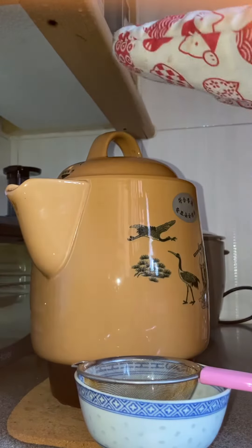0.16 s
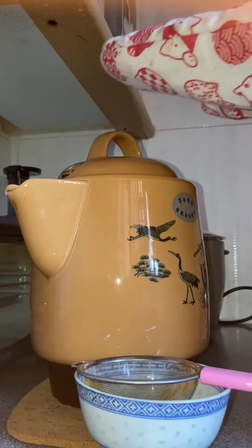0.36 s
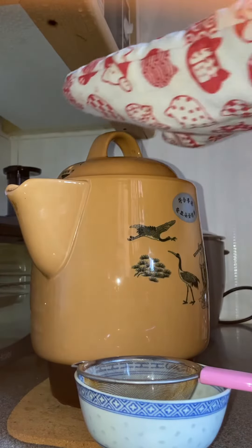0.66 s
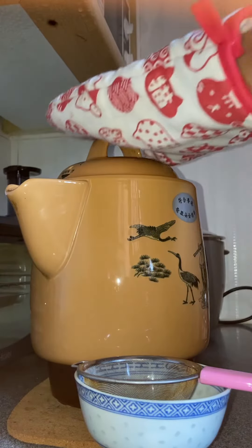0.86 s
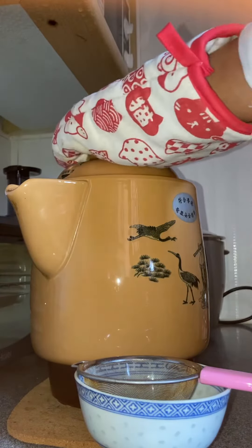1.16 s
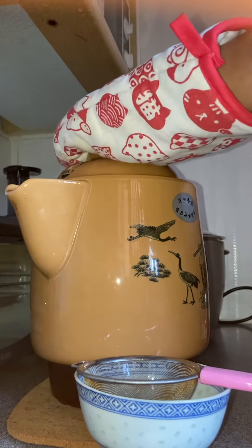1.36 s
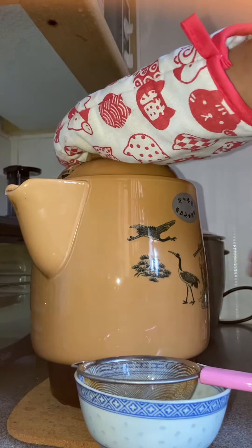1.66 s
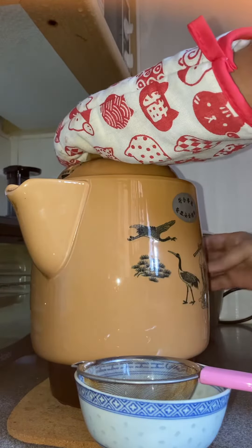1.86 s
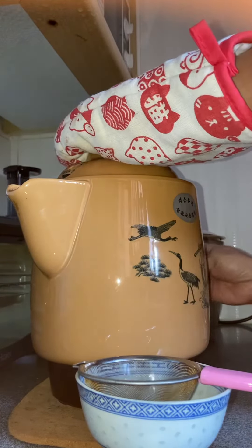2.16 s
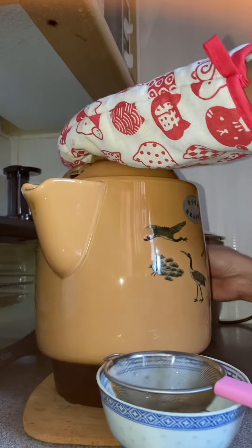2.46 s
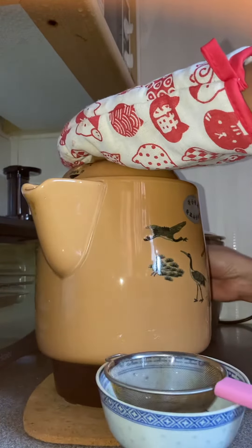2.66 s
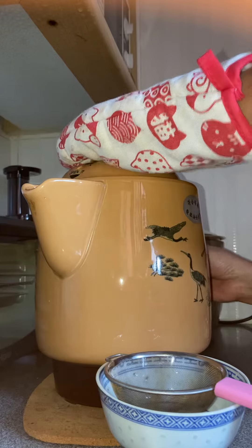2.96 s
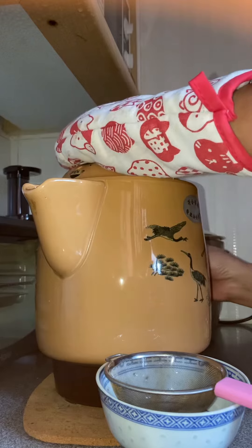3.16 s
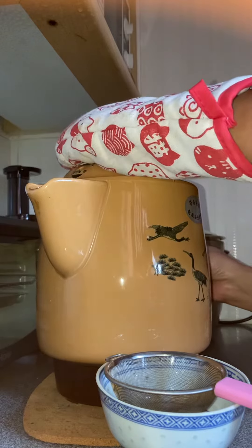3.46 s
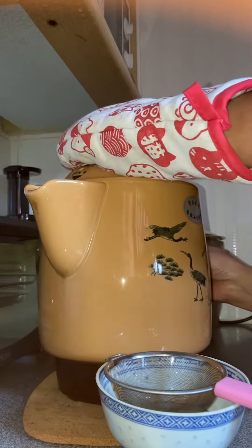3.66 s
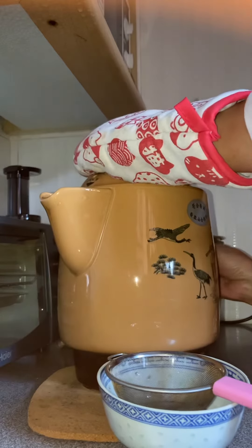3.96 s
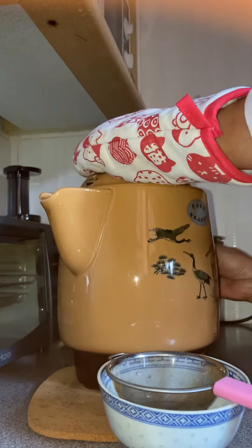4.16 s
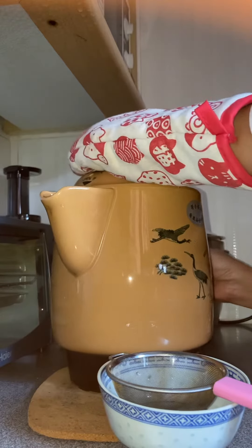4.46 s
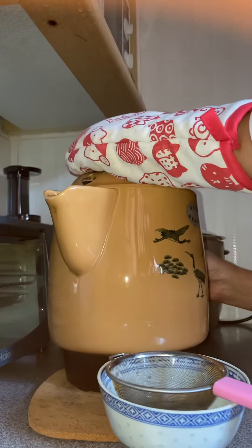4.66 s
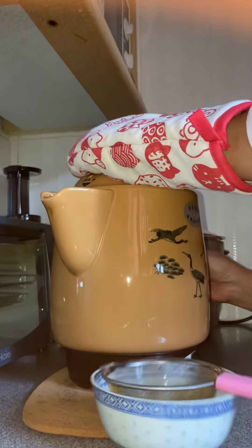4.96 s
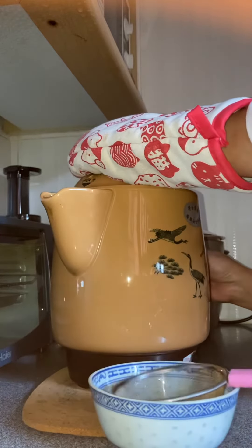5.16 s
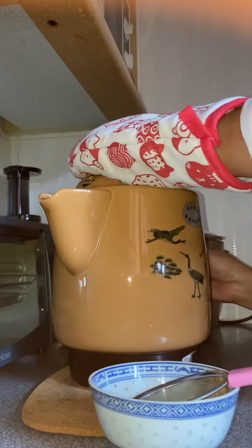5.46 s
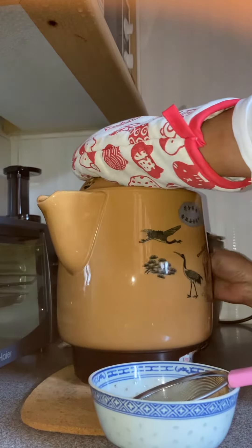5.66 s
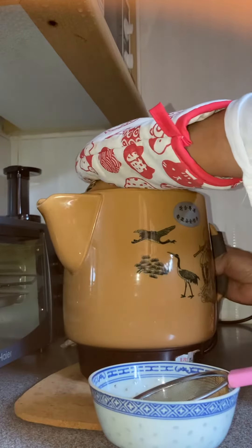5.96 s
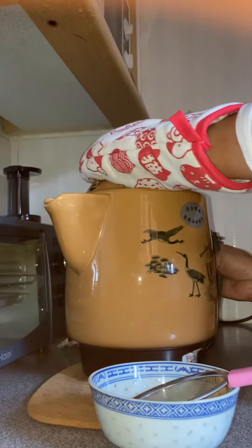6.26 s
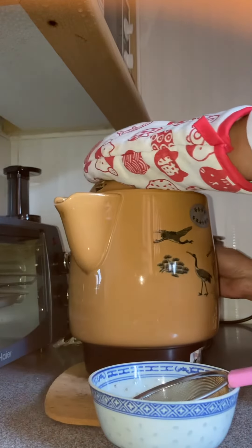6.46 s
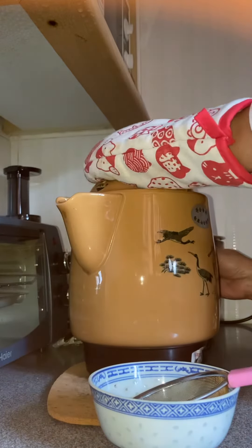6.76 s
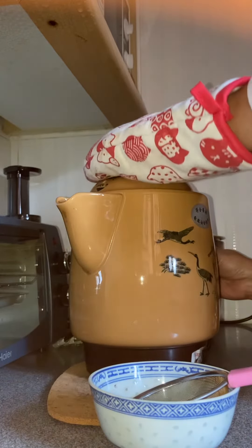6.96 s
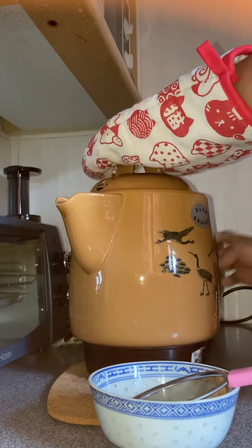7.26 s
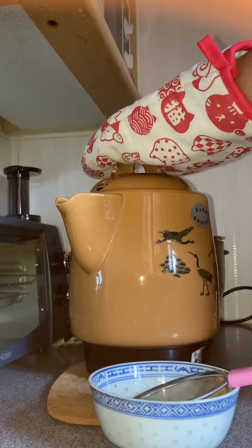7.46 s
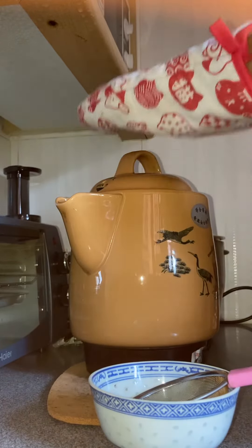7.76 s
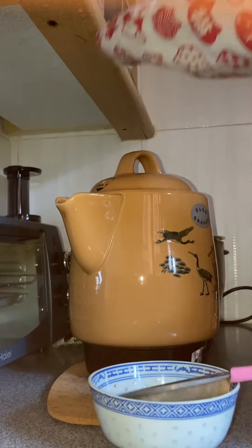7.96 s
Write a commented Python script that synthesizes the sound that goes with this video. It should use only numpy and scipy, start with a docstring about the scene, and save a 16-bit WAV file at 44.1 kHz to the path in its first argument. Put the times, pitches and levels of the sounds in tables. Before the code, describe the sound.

Mostly very quiet: faint hush, low room rumble cutting in and out, barely audible glove rustle. First a moderate ceramic knock with little bouncing clinks, later one dominant pot clunk whose jolt sets a metal strainer jingling and sizzling against a bowl for under half a second. Near the end a gentle lid brush and tap, then one bright strainer-on-porcelain clink. Close, dry, with short kitchen echoes.

```python
"""A ceramic pot, shifted by a gloved and a bare hand, knocks on a kitchen counter close to a two-port microphone.
Its knocks are bursts of uneven contacts ringing the pot; taps are single rings, the bowl's foot grinds in grains.
A wire strainer bounces and rolls in a bowl: its touches set the bowl's rings going and make the mesh sizzle.
Shaped noise makes the glove's rustle, the pot's drag, a faint, flickering hush that never stops, and low background
noise that a noise gate lets through in listed spells; delays that feed back make the kitchen's echoes."""
import sys
import numpy as np
from scipy import signal
from scipy.fft import rfft, irfft, next_fast_len
from scipy.io import wavfile
from scipy.ndimage import uniform_filter1d

SR = 44100
rng = np.random.default_rng(int(sys.argv[2]) if len(sys.argv) > 2 else 0)


def dump(signal):
    """Clip the signal to [-1, 1] and save it as 16-bit WAV at the path in sys.argv[1]."""
    limited = np.clip(np.atleast_2d(signal).T, -1, 1)
    pcm = np.round(limited * 32767).astype(np.int16)
    wavfile.write(sys.argv[1], SR, pcm)


N = 358268   # length of the scene in samples

# In rows that swell and fade, the sound is 20 dB down one rise before and one fall after its loudest
# moment; the sign of a rise or fall does not matter. Noise colours are relative: noise is set to rms 1.

# pot and bowl knocking on base and counter: (time [s], peak level [dB], contact pitch [Hz], chatter t60 [s])
POT_KNOCKS = [(0.384, -54.5, 850, 0.038), (1.128, -51, 324, 0.047), (1.186, -58, 600, .04),
              (1.341, -55.5, 238, 0.065), (2.095, -55, 9020, 0.012), (2.151, -53.5, 500, .2),
              (2.251, -36, 902, 0.051), (2.258, -41, 2600, 0.27), (2.261, -24.5, 910, 0.045),
              (2.285, -19.5, 1000, 0.039), (2.299, -33, 510, 0.09), (2.310, -35.5, 1600, 0.17),
              (2.400, -48.5, 454, .2), (3.027, -54.5, 2930, 0.021), (3.039, -55.5, 750, 0.1),
              (3.466, -49, 2600, 0.038), (3.468, -51.5, 7940, 0.044), (3.800, -39.5, 324, .06),
              (4.442, -47, 2010, 0.036), (4.633, -46, 894.5, 0.033), (4.782, -58.5, 1527, .04),
              (4.938, -26.5, 2511, 0.066), (4.949, -4.5, 1522, 0.067), (4.953, -17.5, 286.7, 0.08),
              (4.967, -22.5, 902.6, .06), (4.984, -16.5, 1526, 0.11), (5.006, -24, 1186, .05),
              (5.012, -27.5, 303.5, .12), (5.035, -30, 615.6, .12), (5.072, -27, 1473, 0.04),
              (5.083, -30, 1600, .07), (5.179, -37, 1592, 0.13), (5.221, -32, 1700, 0.19),
              (5.263, -35, 481.5, 0.05), (5.280, -39, 691, .08), (5.350, -46.5, 454, 0.11),
              (5.439, -52, 2260, 0.3), (5.624, -50, 1440, .03), (5.727, -45, 469, 0.055),
              (7.088, -46, 6050, 0.032), (7.134, -46, 1800, 0.056), (7.614, -48, 1280, .04),
              (7.942, -38, 2900, 0.04), (7.955, -42, 2600, .04), ]
# rings of the pot on the counter, damped by the hands: (pitch [Hz], relative level [dB], t60 [s])
POT_RINGS = [(83.6, 2.5, 0.15), (236, -3.5, 0.069), (359, -5, 0.06), (470, -3.5, 0.05), (568, 1, 0.019),
             (772, -8, 0.033), (1114.6, -11.5, 0.077), (1322, -6, .04), (1690, -3, 0.033),
             (1940, -10, 0.025), (2430, -11, 0.025), (2680, -12, 0.028), (3150, -16.5, .025),
             (3880, -18.5, 0.092)]
# clean taps on the pot's wall, each waking one ring: (time [s], peak level [dB], pitch [Hz], t60 [s])
WALL_TAPS = [(2.264, -26, 919, 0.042), (2.287, -24, 1894, 0.018), (3.029, -47.5, 1974, 0.032),
             (3.031, -56.5, 636, .05), (4.962, -31, 855, 0.064), (5.015, -28, 830, 0.094),
             (2.398, -46, 509, 0.084), (2.534, -53, 374, 0.073), (7.143, -47.5, 1370, 0.026),
             (7.142, -48.5, 1990, .022), (7.147, -44, 810, 0.024)]
# bowl's foot grinding around the first hard knock: (loudest moment [s], level [dB], rise [s], fall [s])
FOOT_SCRAPES = [(2.26, -36, 0.021, 0.2019), (2.242, -54.5, .12, -0.14)]
SCRAPE_HZ, GRIT_PER_S = (470, 1200), 900   # band of the grind [Hz], average grains a second
# pot dragging over its base: (loudest moment [s], level [dB], rise [s], fall [s])
POT_SLIDES = [(.395, -66, .04, .04), (6.33, -70, .07, .3), (4.47, -62, .03, .15), (4.55, -63, .12, .12),
              (4.63, -61, .12, .03), (5.46, -64, .12, .2), (5.75, -66, .05, .15)]
# colour of the drag: (frequency [Hz], level [dB per Hz])
DRAG_COLOUR = [(530, -32.5), (900, -7.5), (2390, -0.5), (4620, -14), (5810, -40), (6200, -10), (8760, -19),
               (12000, -44), (15600, -77), (22000, -120)]

# strainer bouncing on the bowl's rim: (time [s], strength [dB], tilt around 7400 Hz [dB per octave])
STRAINER_BOUNCES = [(2.3073, -28, -1), (2.378, -40, 2.5), (2.43, -45, 3), (2.478, -47, 2),
                    (2.526, -50.5, 1), (2.565, -59, 5), (2.601, -53, -2.5), (2.655, -51, 2.5),
                    (2.704, -57, 6), (4.9523, -21, 10.5), (4.9645, -21.5, -2), (4.983, -20.5, 5),
                    (5.073, -20, 5.5), (5.086, -25.5, 2.5), (5.123, -40, 1.5), (5.163, -37.5, 1.5),
                    (5.186, -39, -8.5), (5.224, -39.5, -7.5), (5.2604, -38, -6), (5.279, -37.5, -1.5),
                    (5.308, -42.5, -3.5), (5.3393, -45, -5.5), (7.9417, -12, 3), (7.949, -21.5, -1.5),
                    (7.9595, -16.5, 6.5)]
# strainer rolling along the rim: (loudest moment [s], level before the contact level [dB], rise [s], fall [s])
STRAINER_ROLLS = [(2.44, -63, 0.042, 0.3), (5.0, -35.5, .02, 0.0367), (5.088, -33.5, 0.0044, -0.0014),
                  (5.192, -39, 0.064, -0.02), (5.275, -42.5, 0.028, 0.0427), (5.28, -49.5, .16, 0.1827),
                  (7.952, -33.5, 0.0078, .015)]
# pitches of bowl and strainer: (pitch [Hz])
BOWL_PITCHES = [1640, 1632, 2990, 2971, 4910, 4900, 7385, 7700, 10320, 12841, 13010, 13650, 15722]
# their rings in the same order, with the strainer resting in the bowl and lifted out:
# (resting level [dB], resting t60 [s], lifted level [dB], lifted t60 [s])
BOWL_RINGS = [(-8.5, 0.038, -3, 0.044), (-15, 0.11, -21.5, 0.32), (-6, 0.079, -6.5, 0.067),
              (-20.5, .25, -17.5, 0.25), (-16, 0.06, -17, 0.051), (-12.5, 0.37, -29.5, 0.2),
              (-2.5, .06, -0.5, 0.019), (-7.5, .015, 2, 0.0095), (-8.5, 0.068, -6, .1),
              (-24.5, .12, -18.5, 0.22), (-13.5, 0.068, -10.5, .053), (-19, .081, -19, 0.099),
              (-13.5, .12, -12, 0.123)]
# colour of the wire mesh's sizzle: (frequency [Hz], level [dB per Hz])
MESH_COLOUR = [(1470, -43.5), (2500, -16.5), (5500, -23.5), (7600, -10), (10600, -8), (12000, -52),
               (12400, -9.5), (13300, -7), (16100, -23.5), (16500, -23.5)]
# until it is lifted out, the strainer rests in the bowl and damps its rings;
# lifted, it shivers and sizzles less: moment [s], then the two changes of level [dB]
LIFTED_S, LIFTED_SHIVER_DB, LIFTED_SIZZLE_DB = 6.5, -24, -13
# wire shivering on the rim after each bounce: start relative to the bounce, before the contact level [dB], t60 [s]
SHIVER_DB, SHIVER_T60_S = -17, 0.11
SHIVER_TILT = 4.5   # tiny contacts hardly move the low rings [dB per octave below 7400 Hz]
SWELL_T60_S = .0035   # a touch lasts a moment, so each ring swells in
SIZZLE_T60_S = .14
# below this strength [dB], touches roll more than they strike: their strikes fall 1.25 dB for each dB
HARD_DB, STRIKE_GROWTH = -20, 1.25
TICK_GROWTH = 1.8   # ticks grow 1.8 dB for each dB of strength, so gentle touches tick far less

# glove cloth brushing the lid: (loudest moment [s], level [dB], rise [s], fall [s])
GLOVE_STROKES = [(.285, -70, .07, .09), (.4, -72, .04, .05), (1.13, -69, .12, .11), (1.87, -65, .05, .15),
                 (1.955, -63, .12, .12), (2.1, -68, .06, .12), (2.26, -65, .08, .05), (2.94, -70, .1, .1),
                 (3.032, -66, .008, .07), (4.4, -69, .22, .15), (6.39, -73, .1, .16), (5.5, -62, .12, .12),
                 (5.75, -68, .15, .12), (6.19, -71, .07, .2), (7.14, -52, .08, .07)]
# colour of the glove's rustle: (frequency [Hz], level [dB per Hz])
CLOTH_COLOUR = [(1470, -35.5), (2500, -15), (3980, -9.5), (5090, -11.5), (5420, -39), (5680, -20),
                (7600, -5.5), (8300, 12), (11000, 4.5), (14000, -2.5), (15600, -12.5), (16500, -29.5)]
FIBRES_PER_S, FIBRE_DB = 600, -8   # fibres catching: average rate, level against the smooth rustle

# spells in which the noise gate lets the low background noise through, later rows replacing earlier:
# (start [s], end [s], level [dB])
GATE_OPEN_SPELLS = [(0, 0.07, -53), (0.211, 0.427, -54), (.47, .893, -56), (1.024, 1.23, -71.5),
                    (1.32, 1.397, -69), (2.105, 2.54, -61), (2.548, 2.78, -63.5), (3.121, 3.275, -68),
                    (3.371, 4.124, -54.5), (4.122, 4.44, -66), (4.447, 4.663, -54.5), (4.786, 4.841, -58),
                    (4.944, 5.34, -49.5), (5.34, 5.852, -58), (5.846, 6.283, -67), (6.278, 7.06, -54.5),
                    (7.061, 7.184, -51.5), (7.435, 7.704, -55.5), (7.739, 8.002, -57), (8.003, 8.13, -67)]
GATE_CLOSED_DB = -77.5   # the level it is turned down to between spells
# colour of the low background noise: (frequency [Hz], level [dB per Hz])
LOW_NOISE_COLOUR = [(12, -60), (30, -34), (48, -11), (91, 1), (169, -11), (323, -10), (361, -8), (709, -27),
                    (966, -25), (1110, -29), (3060, -40), (3520, -50), (8650, -50), (16500, -72)]
# wavering tones within it: (pitch [Hz], width [Hz], level against the noise [dB])
LOW_NOISE_TONES = [(94.6, 4.7, -6.5), (391, 60, -9.5)]
# colour of the faint, flickering hush that never stops: (frequency [Hz], level [dB per Hz])
HUSH_COLOUR = [(18, -51.5), (30, -30), (48, -5), (107, -12), (235, -32.5), (577, -10.5), (625, -13),
               (953, -26.5), (1800, -30.5), (2400, -25.5), (3860, -36.5), (6200, -37.5), (8760, -28),
               (16500, -46)]
HUSH_DB, HUSH_FLICKER_DB = -73, 2.5

# how alike left and right noises are, 1 the same and -1 opposite: (frequency [Hz], likeness [-1 to 1])
LEFT_RIGHT_LIKENESS = [(60, 0.99), (240, .99), (950, -0.042), (3770, -0.47), (15000, 1)]
# how far the left port leads the right, for the pot: (frequency [Hz], lead [radians])
POT_PHASE_LEAD = [(0, 0), (200, -.3), (600, 1.29), (1640, -4.4), (3100, -1.5), (3880, -1.5), (4910, -11),
                  (6120, -9), (7750, -5), (9560, -5), (10900, -2), (12600, -3), (14000, 0), (16500, -0.6)]
# the same for the bowl: (frequency [Hz], lead [radians])
BOWL_PHASE_LEAD = [(0, -0.5), (600, 11.5), (1550, 8), (2150, 7.5), (3620, 9), (4480, 10.5), (6800, 10.5),
                   (11400, 15), (13100, 17), (14400, 20.5), (16500, 17)]
# the same for background, glove and drag: (frequency [Hz], lead [radians])
BACKGROUND_PHASE_LEAD = [(0, 0), (520, -0.33), (780, -1.54), (1210, 5), (1640, 3.5), (3010, 5), (4050, 3),
                         (6120, 2.5), (7750, 5), (9560, 6), (11100, 8.5), (13000, 10), (13900, 13),
                         (16500, 13)]
KITCHEN_T60_S, WALL_CUT_HZ = .35, 5800   # bass fading time of the echoes, treble cut on each round
ECHO_LOW_CUT_HZ = 250   # the bass reaches both ports alike, so echoes carry little of it
# dips in the microphone's response: (frequency [Hz], width [Hz])
MICROPHONE_DIPS = [(5900, 550), (11700, 2000)]
CUTOFF_HZ = 16300


def knocks(body_db, rise_share):
    """Each knock is a chatter of uneven contacts that swells and dies, heard directly and through the pot's rings."""
    out = np.zeros(N + SR)
    t = np.arange(SR // 2) / SR
    for s, peak_db, hz, t60 in POT_KNOCKS:
        swell = 1 - np.exp(-t / (rise_share * t60))
        chatter = rng.laplace(size=len(t)) * swell * from_db(-60 * t / t60)
        band = [hz / 1.817, min(hz * 1.915, 15000)]
        force = signal.sosfilt(signal.butter(2, band, "band", fs=SR, output="sos"), chatter)
        body = np.zeros(len(t))
        for k, (ring_hz, ring_db, ring_t60) in enumerate(POT_RINGS):
            body += (-1) ** k * from_db(ring_db) * ring(force, ring_hz, ring_t60)
        sound = force + from_db(body_db) * body
        # height of the loudest swings, from the strongest short stretch
        crest = np.sqrt(2 * uniform_filter1d(sound ** 2, size=300).max())
        out[round(s * SR):][:len(t)] += from_db(peak_db) * sound / crest
    return out[:N]


def taps():
    """A single contact sets one ring going, swelling in over a moment."""
    out = np.zeros(N)
    for s, peak_db, hz, t60 in WALL_TAPS:
        click = np.zeros(SR // 4)
        click[0] = 1
        # two rings of the same pitch, one driving the other
        sound = ring(ring(click, hz, t60), hz, t60 / 3)
        out[round(s * SR):][:len(click)] += from_db(peak_db) * sound / np.abs(sound).max()
    return out


def scrape():
    """Grit under a sliding foot: dense grains in a dull band, growing with pressure."""
    band = signal.butter(3, SCRAPE_HZ, "band", fs=SR, output="sos")
    grit = signal.sosfilt(band, grains(GRIT_PER_S, spread_db=2.5))
    return swells(FOOT_SCRAPES) * rms_one(grit)


def drag():
    """Unglazed clay rubbing on the base: a dull, uneven hiss."""
    return swells(POT_SLIDES) * noise(DRAG_COLOUR, patchy_db=1.5)


def clinks(scatter_db, contact_db, sizzle_db):
    """Bounces and tiny rolling contacts keep the bowl's rings going; each bounce also makes the mesh tick and sizzle."""
    s, strength_db, tilt = np.transpose(STRAINER_BOUNCES)
    at = np.round(s * SR).astype(int)
    jolts = np.zeros(N)
    jolts[at] = from_db(strength_db)
    resting = np.arange(N) / SR < LIFTED_S
    lifted = ~resting

    # tiny contacts: a shiver after each bounce, and the rolling
    loose = jolts * from_db(LIFTED_SHIVER_DB * lifted)
    shiver = from_db(SHIVER_DB) * fade(loose, SHIVER_T60_S) + swells(STRAINER_ROLLS)
    contacts = shiver * from_db(contact_db) * (rng.random(N) < 1500 / SR)   # about 1500 a second

    # every bounce strikes every ring, a glancing touch tilting it to the treble
    strike_db = np.minimum(strength_db, HARD_DB + STRIKE_GROWTH * (strength_db - HARD_DB))
    chance_db = rng.normal(0, scatter_db, (len(at), len(BOWL_RINGS)))
    swell_gain = 2 * (1 - from_db(-60 / (SWELL_T60_S * SR)))
    rings = np.zeros(N)
    for k, (hz, row) in enumerate(zip(BOWL_PITCHES, BOWL_RINGS)):
        rest_db, rest_t60, lifted_db, lifted_t60 = row
        octaves = np.log2(hz / 7400)
        force = contacts * rng.standard_normal(N) * from_db(SHIVER_TILT * min(octaves, 0))
        force[at] += from_db(strike_db + tilt * octaves + chance_db[:, k])
        force = swell_gain * ring(force, hz, SWELL_T60_S)
        rings += from_db(rest_db) * ring(force * resting, hz, rest_t60)
        rings += from_db(lifted_db) * ring(force * lifted, hz, lifted_t60)

    # the mesh: a short tick, then a sizzling tail
    ticks = from_db(HARD_DB) * (jolts / from_db(HARD_DB)) ** TICK_GROWTH
    tick = from_db(-4) * fade(ticks, 0.01)
    tail = from_db(sizzle_db) * fade(ticks * from_db(LIFTED_SIZZLE_DB * lifted), SIZZLE_T60_S)
    return rings + (tick + tail) * noise(MESH_COLOUR, patchy_db=-2.0)[0]


def glove():
    """Fine fibres sliding over glaze: soft bright noise under each stroke, fluttering as fibres catch."""
    catches = rms_one(fade(np.abs(grains(FIBRES_PER_S, spread_db=4.5)), .02))
    flutter = rms_one(1 + from_db(FIBRE_DB) * catches) * from_db(1.2 * drift(25))
    return swells(GLOVE_STROKES) * flutter * noise(CLOTH_COLOUR, patchy_db=1.2)


def kitchen(x):
    """Eight feedback delays a side, duller on every round, like sound going back and forth between walls."""
    size = next_fast_len(N + SR)   # spare space at the end for the tail
    w = 2 * np.pi * np.fft.rfftfreq(size, 1 / SR)
    wall = 1 / (1 + 1j * w / (2 * np.pi * WALL_CUT_HZ))
    spectrum = rfft(x, size) * w / np.hypot(w, 2 * np.pi * ECHO_LOW_CUT_HZ)
    out = []
    for lags in rng.uniform(.008, 0.028, (2, 8)):   # delays in seconds
        echoes = 0
        for k, lag in enumerate(lags):
            one_round = from_db(-60 * lag / KITCHEN_T60_S) * wall * np.exp(-1j * w * lag)
            echoes = echoes + (-1) ** k * one_round / (1 - one_round)   # all rounds added up
        out.append(irfft(spectrum * echoes, size)[:N])
    return np.array(out)


def gated_low_noise(switch_ms):
    """Low noise with two wavering tones; a noise gate lets it through in listed spells and turns it down between."""
    level_db = np.full(N, float(GATE_CLOSED_DB))
    for start, end, open_db in GATE_OPEN_SPELLS:
        level_db[round(start * SR):round(end * SR)] = open_db
    gain = from_db(uniform_filter1d(level_db, size=int(switch_ms * SR / 1000)))   # slides between levels
    tones = np.zeros(N)
    for hz, width, db in LOW_NOISE_TONES:
        # noise through a narrow ring wavers; a wider ring wavers faster
        tones += from_db(db) * rms_one(ring(rng.standard_normal(N), hz, 2.0 / width))
    return gain * (noise(LOW_NOISE_COLOUR, patchy_db=-1.5) + tones)


def hush():
    """Faint coloured noise that never stops, its level flickering."""
    return from_db(HUSH_DB) * noise(HUSH_COLOUR, HUSH_FLICKER_DB)


def at_ports(x, lead):
    """The left port hears a sound with another phase than the right."""
    pair = np.broadcast_to(x, (2, N))
    hz = np.maximum(np.fft.rfftfreq(N, 1 / SR), 1)
    turn = np.exp(1j * at_hz(lead, hz))
    return np.array([irfft(rfft(pair[0]) * turn, N), pair[1]])


def ring(force, hz, t60):
    """A resonance: a unit click starts a sine near height 1 that dies by 60 dB in t60 seconds."""
    r = from_db(-60 / (t60 * SR))
    w = 2 * np.pi * hz / SR
    # the tiny constant keeps the filter from slowing down on silence
    return signal.lfilter([0, np.sin(w)], [1, -2 * r * np.cos(w), r * r], force + 1e-18)


def fade(jolts, t60):
    """Each jolt dies away by 60 dB in t60 seconds."""
    return signal.lfilter([1], [1, -from_db(-60 / (t60 * SR))], jolts + 1e-18)


def swells(rows):
    """Gain over time: each row swells and fades with a rounded top."""
    t = np.arange(N) / SR
    gain = np.zeros(N)
    for s, db, rise, fall in rows:
        steps = (t - s) / np.where(t < s, rise, fall)
        gain += from_db(db - 20 * steps ** 2)
    return gain


def grains(per_s, spread_db):
    """Random clicks of uneven size and either sign; rms 1."""
    hits = rng.random(N) < per_s / SR
    signs = rng.choice([-1, 1], N)
    sizes = from_db(spread_db * np.minimum(rng.exponential(1, N), 4))
    return rms_one(hits * signs * sizes)


def noise(spectrum, patchy_db):
    """Stereo noise of a given colour, flickering in level, with a left-right likeness by pitch; rms 1."""
    hz = np.maximum(np.fft.rfftfreq(N, 1 / SR), 1)
    mid, side = rfft(rng.standard_normal((2, N))) * from_db(at_hz(spectrum, hz))
    alike = np.clip(at_hz(LEFT_RIGHT_LIKENESS, hz), -1, 1)
    # the middle is shared; the side has opposite signs left and right
    pair = np.sqrt(1 + alike) * mid + np.sqrt(1 - alike) * side * [[1], [-1]]
    return rms_one(irfft(pair, N) * from_db(patchy_db * drift(4.6)))


def drift(rate):
    """Slow random wandering of rms 1; a higher rate wanders faster."""
    r = np.exp(-80 * np.pi * rate / SR)   # one step spans 40 samples
    steps = rng.standard_normal(N // 40 + 2002)
    slow = signal.lfilter([1], [1, -2 * r, r * r], steps)[2000:]   # skip the settling
    return np.interp(np.arange(N) / 40, np.arange(len(slow)), rms_one(slow))


def at_hz(points, hz):
    """A curve of points read on a log-frequency axis."""
    point_hz, values = np.array(points).T
    return np.interp(np.log(hz), np.log(np.maximum(point_hz, 1)), values)


def rms_one(x):
    """Scaled to rms 1."""
    return x / np.sqrt(np.mean(x ** 2) + 1e-20)


def from_db(db):
    """Gain of a level in dB."""
    return 10 ** (np.asarray(db) / 20)


def scene():
    """Pot, bowl and their echoes over the glove, the drag and the background noise."""
    pot = knocks(body_db=-21.0, rise_share=0.14) + scrape()
    tapped = taps()
    bowl = clinks(scatter_db=2.0, contact_db=-5.5, sizzle_db=-12.0)
    pot_pair = at_ports(pot, POT_PHASE_LEAD) * from_db([[-.4], [.4]])   # slightly louder on the right
    near = pot_pair + at_ports(bowl, BOWL_PHASE_LEAD) + tapped
    echoes = from_db(-17.5) * kitchen(pot) + from_db(-28) * kitchen(bowl + from_db(1.5) * tapped)
    background = gated_low_noise(switch_ms=6.1) + hush() + glove() + drag()
    return near + echoes + at_ports(background, BACKGROUND_PHASE_LEAD)


def record(dry):
    """The microphone dips twice in the treble; then peaks are rounded and the top is cut."""
    for hz, width in MICROPHONE_DIPS:
        dry = signal.lfilter(*signal.iirnotch(hz, hz / width, SR), dry)
    top = .9   # peaks bend towards this height
    rounded = top * np.tanh(dry / top)
    return signal.sosfilt(signal.cheby2(12, 70, CUTOFF_HZ, fs=SR, output="sos"), rounded)


dry = scene()
out = record(dry)
dump(out)
```